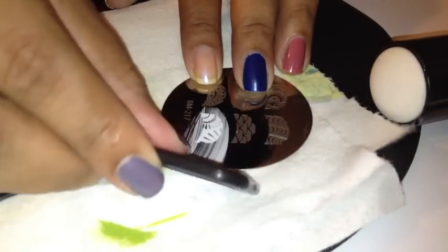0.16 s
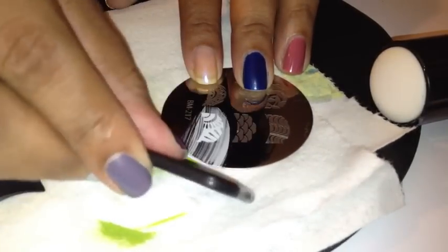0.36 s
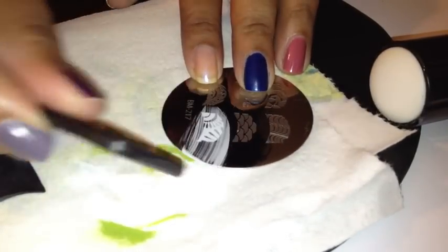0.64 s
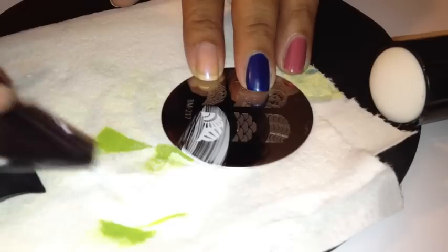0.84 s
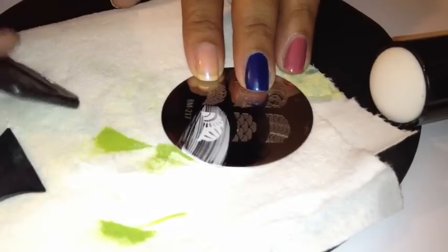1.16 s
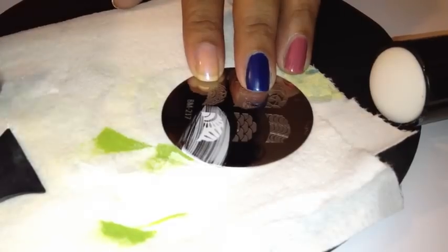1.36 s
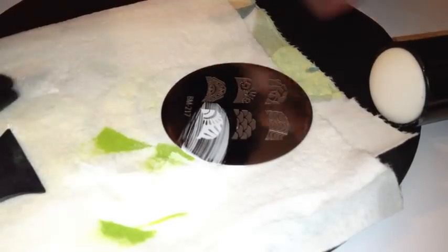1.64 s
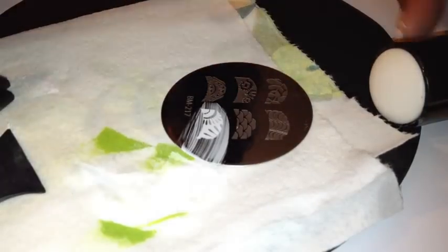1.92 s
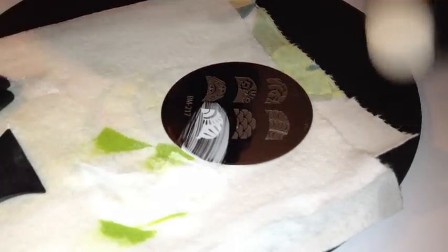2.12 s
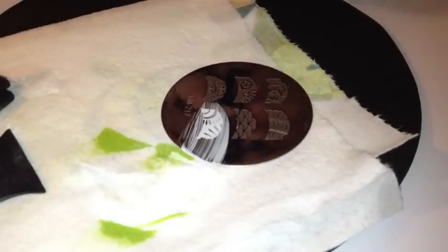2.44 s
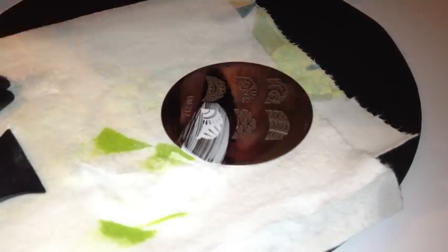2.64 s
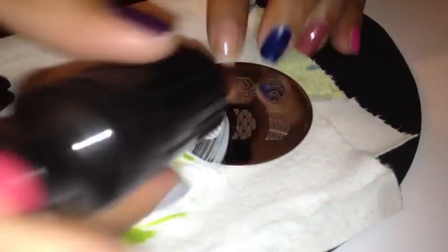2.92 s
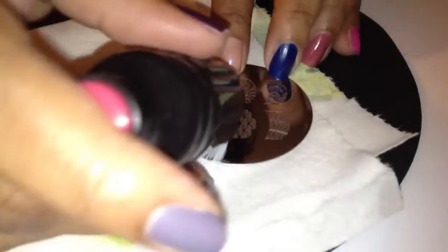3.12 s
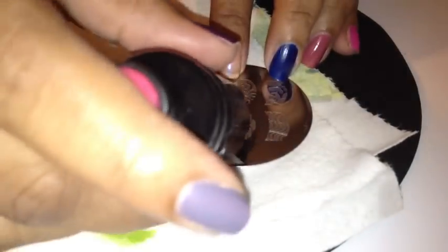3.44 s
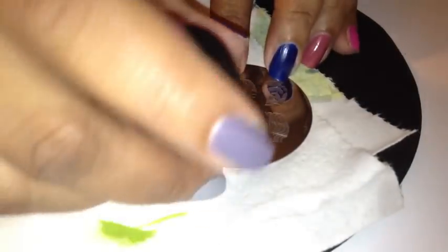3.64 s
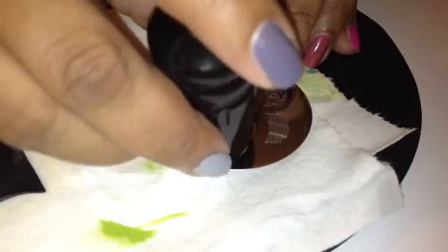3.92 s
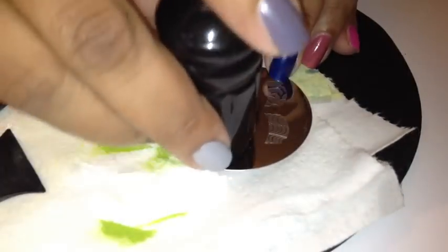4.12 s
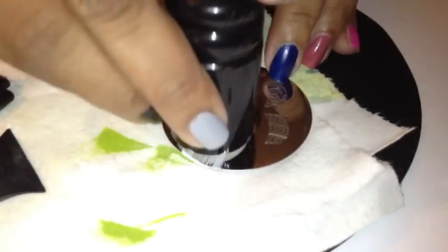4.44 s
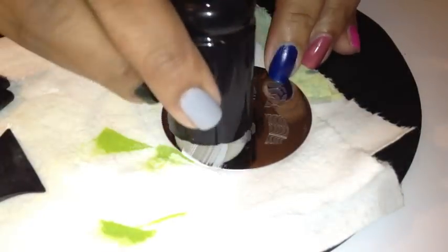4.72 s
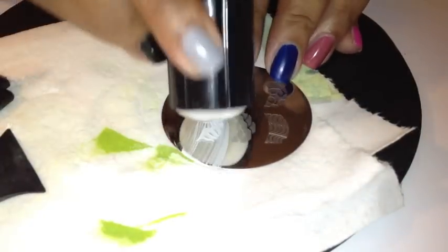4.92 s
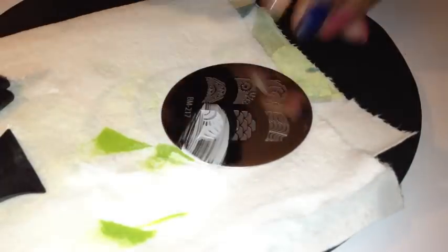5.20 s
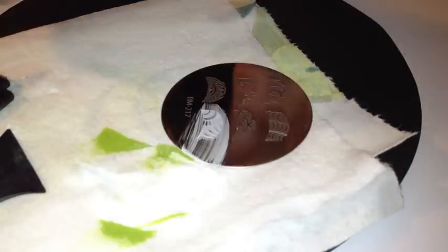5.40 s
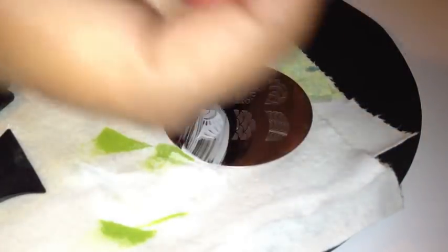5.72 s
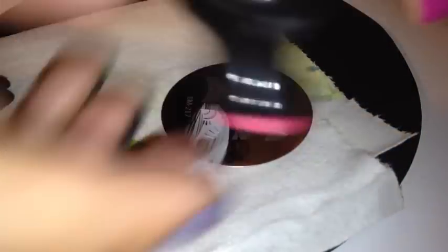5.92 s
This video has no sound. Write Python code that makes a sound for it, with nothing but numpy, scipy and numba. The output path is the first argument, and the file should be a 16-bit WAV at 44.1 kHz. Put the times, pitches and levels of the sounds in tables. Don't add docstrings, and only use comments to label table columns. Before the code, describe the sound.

Short gritty scrapes and a hard tap on a small steel plate, soft wipes, a table thump, hollow rattling, faint nail ticks, then a sticky snap.

```python
import sys
import numpy as np
from scipy import signal
from scipy.fft import rfft, irfft
from scipy.io import wavfile
from scipy.ndimage import uniform_filter1d
from numba import njit

SR = 44100
rng = np.random.default_rng(int(sys.argv[2]) if len(sys.argv) > 2 else 0)


def ratio_of_db(decibels):
    return 10 ** (np.asarray(decibels, float) / 20)


def unload_audio(sound):
    columns = np.transpose(np.atleast_2d(sound))
    steps = np.round(np.clip(columns, -1, 1) * 32767)
    wavfile.write(sys.argv[1], SR, steps.astype(np.int16))


N = 267334

# f/Hz, width/Hz, level/dB
EDGE = [(3540, 360, -5), (3886, 1150, -11), (4140, 640, -2.5)]
GRIT = [(6160, 940, -1), (7800, 2100, -1.5), (9000, 3900, -16), (13500, 4100, -37)]
BLADE = [(820, 350, -5), (1200, 690, 3.5), (2050, 960, -20), (2550, 1170, 6)]
TOWEL = [(462, 80, 3.5), (780, 600, -10.5)]
# f/Hz, level/dB, t60/s
TABLE = [(161.3, -8, 0.16), (216, -2, 0.038), (268, 4, 0.017), (345, -12.5, 0.1), (449.4, -6, 0.062),
         (500, -11, 0.061)]


def rub():
    grains = slips(rough_db=2, patchy_db=1.5, rate=180)
    edge, grit, blade = (level(humps(grains * ratio_of_db(1.16 * walk(120)), part), 0) for part in (EDGE, GRIT, BLADE))
    jolts = slips(rough_db=3.5, patchy_db=3.5, rate=66)
    table = level(ring(jolts, TABLE), 0)
    towel = level(humps(jolts, TOWEL), 0)
    on_edge, on_grit, on_blade, on_towel, on_table, flex_hz = strokes()
    body = 0.71 * blade + level(sweep(grains, flex_hz, 0.37), -14.0)
    return on_edge * edge + on_grit * grit + on_blade * body + on_towel * towel + on_table * table


# t/s of the peak, edge level/dB, rise/s, fall/s, push on the table/dB re edge
SCRAPE = [
    (.02, -35.5, 0.19, 0.31, -7),
    (.14, -43, 0.15, 0.053, 5.5),
]
SKID = [
    (.242, -35, 0.033, 0.084, 8.3),
]
DRAG = [
    (.485, -30.5, 0.042, 0.088, 7),
    (.54, -28, 0.097, 0.02, -0.5),
]
WIPE = [
    (.874, -55, 0.044, .05, 11),
    (.958, -41.5, 0.056, 0.067, 0),
    (.99, -43, 0.11, 0.33, -8),
    (1.084, -48.5, 0.34, 0.27, -17),
]
FLICK = [
    (1.3, -32, 0.071, 0.13, -8),
    (1.36, -38.5, 0.12, 0.021, 5),
    (1.556, -41.5, 0.24, 0.091, -6),
    (1.6, -38, 0.11, 0.22, -6),
    (1.69, -44, 0.19, .12, 4.5),
]
PULL = [
    (5.082, -39.5, 0.037, 0.054, -18),
    (5.936, -44, 0.21, 0.12, -12),
]
HANDLING = [(.4, -54, .08, 0.11, 6), (.64, -50, 0.14, 0.17, -7), (.74, -59, .04, 0.11, 9),
            (1.86, -57, 0.19, 0.48, 6), (2.56, -54.5, .5, 0.2, 1.5), (2.72, -51, .2, 0.12, -13),
            (2.775, -49, .03, 0.16, 5.5), (2.95, -56, .1, 0.18, -3), (3.3, -63, .6, 1.6, 8),
            (4.2, -60, .8, 0.45, 6.5), (4.72, -59.5, 0.14, .2, 11), (4.93, -54, 0.21, 0.14, 8),
            (5.03, -55, 0.11, .1, 12), (5.12, -48, 0.032, 0.18, 1), (5.242, -48.5, 0.11, .08, -.5),
            (5.32, -50, .04, 0.22, -7), (5.6, -53, 0.58, 0.13, -2), (5.75, -51.5, 0.35, .3, -1),
            (6.05, -63, 0.068, .04, 8)]
# strokes, then grit, blade and towel level/dB re edge, blade resonance f/Hz
GRIPS = [
    (SCRAPE, -5, 2.3, -14, 2300),
    (SKID, -11, 4.6, 4.6, 750),
    (DRAG, -1.5, 3, -5, 1470),
    (WIPE, 4.7, 4.2, -8.5, 1200),
    (FLICK, .3, -5.5, -7.5, 2300),
    (PULL, -1, -4, -17, 2200),
    (HANDLING, 0.99, 0.57, -6, 1500),
]


def strokes():
    drop_db, roundness = 22, 1.245
    t = np.arange(0, N / SR, .001)
    total = 1e-12
    for rows, grit_db, blade_db, towel_db, flex_hz in GRIPS:
        for s, db, rise, fall, push_db in rows:
            away = np.abs(t - s) / np.where(t < s, rise, fall)
            power = ratio_of_db(db - drop_db * away ** roundness) ** 2
            shares = ratio_of_db(np.array([grit_db, blade_db, towel_db, push_db])) ** 2
            total = total + np.outer([1, *shares, flex_hz], power)
    flex = np.maximum(total[-1] / total[0], 500)
    return [np.interp(np.arange(N) / SR, t, row) for row in [*np.sqrt(total[:-1]), flex]]


# t/s, peak level/dB, f/Hz, body level/dB re peak
CHATTER = [(.0084, -16.5, 3800, 1.5), (.0273, -25, 4230, 6), (.0374, -19, 4130, -10), (.0594, -32, 4140, 5),
           (.07, -18, 4070, -9), (.107, -15.5, 3540, -14), (.114, -20, 3890, -3), (.1324, -29, 3840, -4),
           (.1876, -21, 3400, -6)]
CATCHES = [(.2132, -7, 3450, -21), (.2141, -9.5, 8600, -22), (.3232, -27, 7900, -22),
           (.4527, -32.5, 4290, 11.5), (.7097, -17.5, 8500, -32), (.7956, -36, 4290, -17),
           (.8585, -33, 7930, -17), (.9551, -31, 7450, 9.5), (1.476, -27, 7730, -20),
           (1.5474, -22, 4190, -1.5), (1.5882, -15.5, 4000, -13), (1.597, -21, 6610, -19),
           (1.6252, -21, 6540, -27), (1.706, -25, 7240, -21), (1.7203, -32, 4260, -20),
           (1.7443, -22, 6340, -23), (1.7567, -20.5, 6640, -25)]
NAILS = [(2.5036, -20, 3400, -9), (2.5377, -33, 3620, -2), (2.7672, -34, 4330, 3), (2.8037, -35, 3140, 5),
         (2.8594, -30.5, 8890, 2), (2.963, -36.5, 3340, 7), (3.1171, -25.5, 3940, -23),
         (3.1428, -25.5, 6510, -23), (3.1464, -28.5, 3770, -20), (3.2648, -27, 6550, -16),
         (3.2844, -29, 6670, -11), (3.3253, -28, 3880, -20), (3.3664, -29.5, 3890, -9),
         (3.406, -26.5, 3990, -8), (3.4433, -28, 3290, -14), (3.4597, -27, 6520, -9)]
CRACKLE = [(4.956, -25, 4400, -24), (5.032, -32, 4070, -14), (5.063, -21.5, 3920, -21),
           (5.0779, -23, 4230, -21), (5.0985, -19.5, 4160, -16), (5.114, -32.5, 4060, 10),
           (5.213, -25, 4200, -17), (5.2165, -24.5, 6450, -18), (5.231, -31, 6500, -14),
           (5.2474, -21.5, 4470, -24)]
# events, body f/Hz, rise/ms
TICKERS = [
    (CHATTER, 2500, 0.45),
    (CATCHES, 1130, 0.95),
    (NAILS, 910, 0.72),
    (CRACKLE, 2700, 0.8),
]


def ticks():
    out = np.zeros(N)
    for events, body_hz, ms in TICKERS:
        for (s, db, hz, body_db), noise in zip(events, rng.standard_normal((len(events), 1000))):
            crack = burst(noise, ms)
            add(out, s, humps(crack, EDGE + GRIT + [(hz, 1100, 4), (13000, 5000, -10)]), db)
            add(out, s, humps(crack, BLADE + [(body_hz, 400, 8)]), db + body_db + 0.5)
    return out


# t/s, peak level/dB, f/Hz, length/ms
SQUEAKS = [(.006, -31, 2500, 2.4), (.026, -21, 2650, 3), (.036, -19, 4170, 2.3), (.050, -26, 4100, 5),
           (.060, -19, 2660, 3.4), (0.104, -26, 2590, 3.6), (0.129, -21.5, 2550, 2.3),
           (0.179, -22.5, 2640, 5.9), (.463, -33, 1300, 3.4), (.474, -23, 3900, 5), (.491, -17.5, 1200, 2),
           (.496, -21, 4200, 3), (0.528, -14.5, 3970, 4.8), (.524, -16.5, 9000, 6.1),
           (.544, -15.5, 9100, 2.2), (1.66, -30, 2190, 4.8), (2.066, -9.5, 876, 3.4),
           (2.081, -13, 985, 2.6), (2.7, -30, 10300, 16), (4.70, -42, 164, 8.1), (4.955, -38.5, 184, 9.1),
           (5.006, -33, 187, 10)]


def squeaks():
    out = np.zeros(N)
    for (s, db, hz, ms), noise in zip(SQUEAKS, rng.standard_normal((len(SQUEAKS), 3000))):
        peak = [(hz, 0.13 * hz, 0)]
        once = humps(burst(noise, ms), peak)
        add(out, s, humps(once, peak), db - 3)
    return out


# t/s, peak level/dB, contact/ms
THUMPS = [(0.212, -17, 2.3), (0.227, -34, 2), (0.954, -28, 2.6), (1.523, -31.5, 3.2), (1.655, -39, 2.6),
          (1.672, -7, 2.16), (2.537, -29.5, 2.7), (2.762, -28.5, 0.87), (2.798, -40, 1.2),
          (2.859, -38, 1.6), (3.429, -31, 1.3), (4.685, -14.5, 1.17), (4.783, -32, 2.2), (4.85, -20, 2),
          (4.961, -36, 2.4), (5.013, -39, 2.6), (5.034, -40, 3.8), (5.099, -24, 1.2), (5.106, -23.5, 1.65)]


def thumps(events, body):
    out = np.zeros(N)
    t = np.arange(7000) / SR
    for (s, db, ms), mix in zip(events, rng.standard_normal((len(events), len(body)))):
        push = np.sin(np.pi * np.clip(t / (ms * .001), 0, 1)) ** 2
        modes = [(hz * (1 + 0.0044 * m), d + 3.0 * m, t60) for (hz, d, t60), m in zip(body, mix)]
        add(out, s, ring(push, modes), db)
    return out


# t/s, peak level/dB
TAP = [
    (0.2132, -2),
]
PRESS = [
    (4.687, -21.5),
]
PEEL = [
    (5.099, -26),
    (5.108, -23),
    (5.116, -33),
]
# f/Hz, level/dB, t60/s
PLATE = [(475, 7, 0.014), (760, -1, 0.031), (1140, -4, 0.015), (1432, -13, 0.037), (2010, -7, 0.014),
         (2500, -14, 0.016), (3500, -6, 0.011), (6130, -0.5, 0.0095)]
PRESS_MODES = [(660, -3, 0.011), (1120, -5, 0.019), (1690, -6, 0.0069), (2550, 1.5, 0.0083),
               (3700, -5, 0.007)]
PEEL_MODES = [(1096, 4, 0.024), (1025, -10, 0.038), (2210, -3, 0.023), (2650, -7, .025), (530, -5, 0.026)]


def contacts():
    return knocks(TAP, PLATE, 0.94) + knocks(PRESS, PRESS_MODES, 0.5) + knocks(PEEL, PEEL_MODES, 1.75)


def knocks(events, modes, ms):
    out = np.zeros(N)
    for (s, db), noise in zip(events, rng.standard_normal((len(events), 4000))):
        add(out, s, ring(burst(noise, ms), modes), db)
    return out


# t/s, hollow level/dB, rim hiss level/dB re hollow
LIFT = [
    (2.02, -54, -4),
    (2.034, -29, -18),
    (2.076, -12.5, -12),
    (2.088, -12.5, -25),
    (2.12, -56, -27),
]
# t/s, peak level/dB, contact/ms
RATTLE = [
    (2.034, -23.5, .8),
    (2.05, -17, 0.89),
    (2.06, -17, 1),
    (2.068, -11, 0.48),
    (2.075, -13, 0.37),
    (2.083, -8, 0.96),
    (2.099, -16.5, 0.56),
]
# f/Hz, level/dB, t60/s
STAMP = [(203, -24, 0.074), (333, -26, 0.063), (460, -10, 0.08), (517, -9, 0.081), (530, -5, 0.063),
         (666, -18, .08), (850, -6, 0.08), (985, -6.5, 0.069), (1265, -13, 0.058), (1590, -10.5, 0.035)]


def stamp():
    fade, (hollow_db, rim_db) = curve(LIFT)
    grains = slips(rough_db=0.5, patchy_db=2.0, rate=140)
    hollow = ratio_of_db(-33) * ring(grains * fade * ratio_of_db(hollow_db), STAMP)
    rim = humps(grains, [(1600, 700, -9), (2500, 1100, 6.5), (4290, 470, 9.5), (7900, 1200, 8.0), (9700, 500, 0)])
    return thumps(RATTLE, STAMP) + hollow + fade * ratio_of_db(hollow_db + rim_db) * level(rim, -1.06)


# f/Hz, level/dB per Hz
ROOM = [(25, -18.5), (60, -15.5), (95, -12.5), (125, -1.5), (230, 2.5), (400, -3), (700, -5.5), (1500, -8),
        (2800, -9), (4200, -8.5), (5200, -10.5), (8000, -12), (10300, -16.5), (13500, -11)]


def room():
    hz, db = np.transpose(ROOM)
    f = np.maximum(np.fft.rfftfreq(N, 1 / SR), 1)
    colour = rfft(rng.standard_normal(N)) * ratio_of_db(np.interp(np.log(f), np.log(hz), db))
    low = 1 / (1 + (f / 500) ** 2)
    murmur = irfft(colour * low, N) * ratio_of_db(2.1 * walk(5.87))
    hiss = irfft(colour * (1 - low), N) * ratio_of_db(0.43 * walk(3.4))
    return level(murmur + hiss, -45)


def slips(rough_db, patchy_db, rate):
    size = ratio_of_db(rough_db * np.minimum(rng.exponential(size=N), 4) + patchy_db * walk(rate))
    return level(size * rng.standard_normal(N), 0)


def walk(rate):
    k = int(SR / rate)
    return uniform_filter1d(np.repeat(rng.standard_normal(N // k + 1), k), k)[:N]


def burst(noise, ms):
    t = np.arange(len(noise)) / SR / (ms * .001)
    return noise * t * np.exp(-t)


def ring(x, modes):
    out = 0
    for hz, db, t60 in modes:
        r = np.exp(-np.log(1000) / (t60 * SR))
        turn = 2 * np.pi * hz / SR
        out = out + ratio_of_db(db) * signal.lfilter([0, r * np.sin(turn)], [1, -2 * r * np.cos(turn), r * r], x + 1e-18)
    return out


def humps(x, peaks):
    return sum(ratio_of_db(db) * signal.lfilter(*signal.iirpeak(hz, hz / width, SR), x) for hz, width, db in peaks)


@njit
def sweep(x, hz, share):
    y, band, low = np.empty(len(x)), 0., 0.
    for i in range(len(x)):
        g = np.tan(np.pi * hz[i] / SR)
        v = (band + g * (x[i] - low)) / (1 + g * (g + share))
        band, low, y[i] = 2 * v - band, low + 2 * g * v, share * v
    return y


def curve(rows):
    s, *columns = np.transpose(rows)
    t = np.arange(N) / SR
    fade = np.clip(np.minimum(t - s[0], s[-1] - t) / .008, 0, 1)
    return fade, [np.interp(t, s, c) for c in columns]


def level(x, db):
    return x * ratio_of_db(db) / np.sqrt(np.mean(x ** 2))


def add(out, s, sound, peak_db):
    start = int(s * SR)
    out[start:start + len(sound)] += (sound * ratio_of_db(peak_db) / np.abs(sound).max())[:N - start]


# f/Hz, width/Hz, depth 0-1
DIPS = [(5110, 880, 0.83), (11200, 4600, 0.36)]


def scene():
    near = rub() + squeaks() + thumps(THUMPS, TABLE) + contacts() + stamp()
    near = signal.sosfilt(signal.butter(6, 149, "high", fs=SR, output="sos"), near)
    dull = signal.sosfiltfilt(signal.butter(4, 10300, fs=SR, output="sos"), near)
    near = dull + 0.67 * (near - dull) + ticks()
    for hz, width, depth in DIPS:
        near = near - depth * signal.lfilter(*signal.iirpeak(hz, hz / width, SR), near)
    t = np.arange(8000) / SR
    tail = level(rng.standard_normal(len(t)) * np.exp(-t / 0.026) * (t > .003), -52.0)
    mono = near + signal.fftconvolve(near, tail)[:N] + room()
    return np.array([mono, mono])


def roll_off(x):
    return signal.sosfilt(signal.butter(12, 16500, fs=SR, output="sos"), x)


def record(dry):
    limited = np.clip(dry, -.97, .97)
    mix = signal.sosfilt(signal.ellip(8, .2, 55, 15350, fs=SR, output="sos"), limited)
    return roll_off(mix)


dry = scene()
out = record(dry)
unload_audio(out)
```